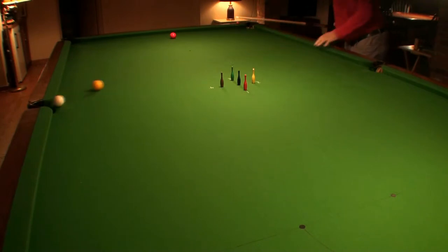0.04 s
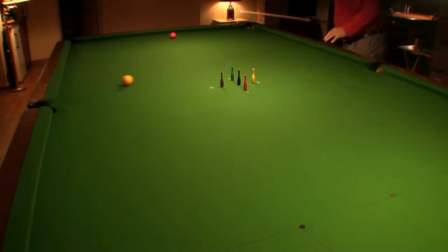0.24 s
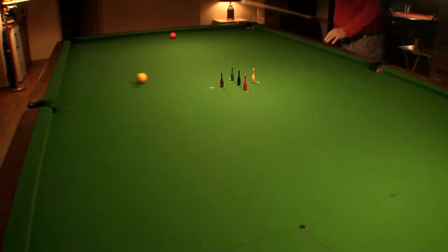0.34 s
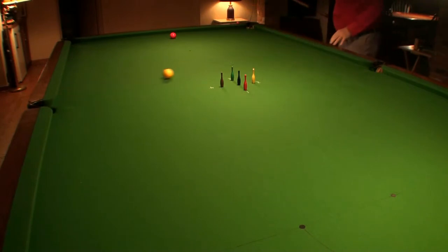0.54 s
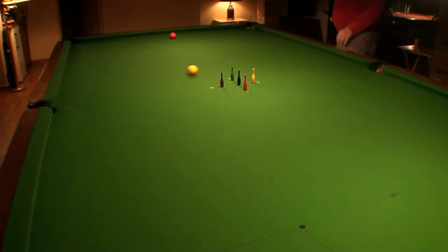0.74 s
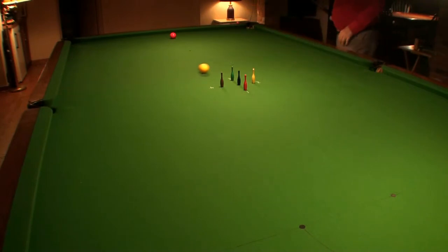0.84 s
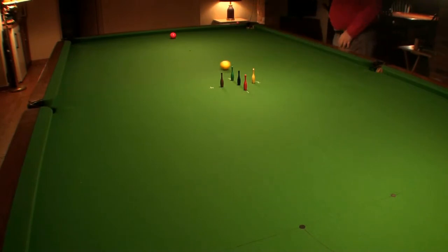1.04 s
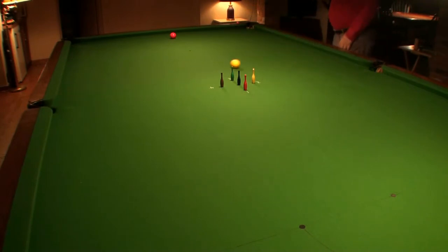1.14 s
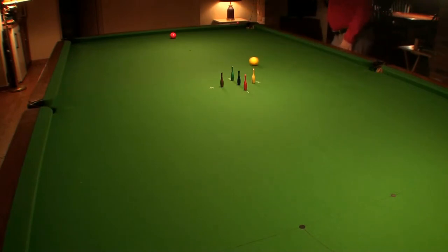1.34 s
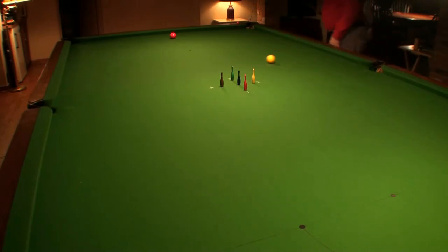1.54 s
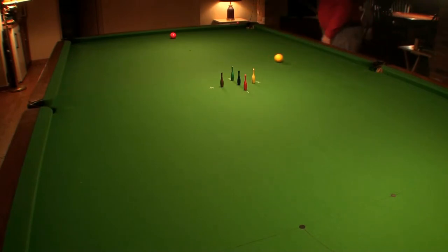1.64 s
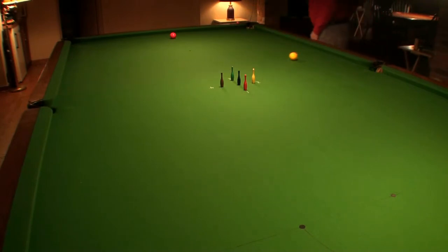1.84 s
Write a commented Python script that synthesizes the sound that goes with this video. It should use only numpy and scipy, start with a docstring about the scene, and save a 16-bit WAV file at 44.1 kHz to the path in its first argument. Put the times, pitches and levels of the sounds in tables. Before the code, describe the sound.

Billiard balls click sharply after a cue strike, then one rolls into a cushion.

```python
"""One shot on a billiard table in a quiet room. An earlier knock is dying away when the cue strikes,
setting shaft and ball ringing. The ball clicks hard against a second ball; a softer click and a brief
clatter follow. Near surfaces reflect the stroke and the two clicks as distinct echoes, then the room
reverberates. Afterwards a ball rolls on over the cloth and thumps into a cushion while the player
shuffles about."""
import sys
import numpy as np
from scipy import signal
from scipy.fft import rfft, irfft
from scipy.io import wavfile

SR = 44100
rng = np.random.default_rng(int(sys.argv[2]) if len(sys.argv) > 2 else 0)


def output_pcm(signal):
    """Save a mono or channel-first signal as 16-bit PCM at the path in sys.argv[1].

    Samples are clipped to [-1, 1] before scaling.
    """
    pcm = np.clip(np.atleast_2d(signal).T, -1, 1) * 32767
    wavfile.write(sys.argv[1], SR, np.round(pcm).astype(np.int16))


N = 83790
T = np.arange(N) / SR

# likeness of left and right in a diffuse field: frequency_hz, correlation
COHERENCE = [(60, 0.76), (250, 0.44), (420, 0.31), (700, 0.23), (1200, 0.23), (4000, 0.55), (8000, 0.7),
             (12000, 0.71)]
# reverberation time of the room: frequency_hz, t60_s
ROOM_T60 = [(100, 0.91), (250, 0.59), (600, 0.42), (1200, 0.39), (2800, 0.32), (4200, 0.41), (12000, 0.13)]
# colour of the reverberation: frequency_hz, gain_db
ROOM_COLOUR = [(130, 2), (400, 1.5), (1000, -0.5), (2000, -0.5), (3200, -2), (4300, -1), (9000, -1.5)]
# its lean, mostly to the left: frequency_hz, left_minus_right_db
ROOM_BALANCE = [(200, 4.5), (600, -2), (1300, 2), (2800, 1), (7000, 2), (12000, -5.5)]
ROOM_DB, ROOM_DELAY_S, ROOM_BUILD_S = 5.5, .003, 0.0039
SCATTER_DB, SCATTER_T60_S = 5, 0.078
# reflections off table, lamp and walls: delay_s, left_db, right_db
ECHOES = [(.0029, 4.5, -1), (.0063, 0.5, -2.5), (.0067, -16, -37), (0.009, 2, -40.5), (0.01, -7, -46),
          (0.024, -2.5, -9), (.0309, -14, -32), (.0313, -4.5, -9.5), (.0325, -8.5, -14)]
# stereo width, narrow in the bass: frequency_hz, side_gain_db
WIDTH = [(100, -10.5), (400, -7), (650, -1), (900, -1.5), (10000, 1), (13000, -8)]

# room tone and hiss: frequency_hz, relative_density_db
ROOM_TONE_SPECTRUM = [(25, -6), (40, -4), (65, 4), (100, -6.5), (300, -16), (1000, -8), (2500, -16.5),
                      (7000, -21.5), (13000, -25)]
# tail of the earlier knock: frequency_hz, relative_density_db
FADING_SPECTRUM = [(100, 5.5), (400, 1.5), (1000, -8.5), (2500, 0.5), (4000, -16), (7000, -43)]
# scuffs of shoes and clothes: start_s, level_db, rise_s, decay_s
SCUFFS = [(0.028, -53, 0.0083, 0.038), (0.465, -53.5, 0.01, 0.12), (0.534, -54.5, 0.006, 0.11),
          (0.598, -60, 0.0064, 0.049), (0.709, -58, 0.016, 0.27), (0.96, -48.5, 0.011, 0.037),
          (1.43, -57.5, 0.047, 0.072), (1.58, -46, 0.013, 0.041), (1.68, -57.5, 0.025, .05)]
# their friction noise: frequency_hz, relative_density_db
SCUFF_SPECTRUM = [(150, -15), (800, -0.5), (1500, -4.5), (2800, -0.5), (5000, -1), (8000, -2), (10000, -12),
                  (13000, -11.5)]
# loudness of the rolling ball: time_s, level_db
ROLL_LEVEL = [(0.15, -62), (0.3, -52), (0.85, -61), (1.12, -59), (1.22, -59), (1.35, -62.5), (1.6, -63),
              (1.74, -54), (1.9, -65)]
# its noise on the cloth: frequency_hz, relative_density_db
ROLL_SPECTRUM = [(60, -4), (180, 2), (500, -1.5), (1200, -8.5), (2500, -15.5), (6000, -47)]
# thumps on cushion and table: start_s, level_db, pitch_hz, t60_s, rail_db
THUMPS = [(0.0, -47.5, 150, 0.54, -49), (0.028, -46, 155.3, 0.54, -49), (0.538, -41.5, 119, 0.098, -51),
          (1.05, -48.5, 194, 0.082, -62), (1.659, -43, 129, 0.29, -43.5)]
# rumble of the rail: frequency_hz, gain_db
RAIL_SPECTRUM = [(50, 10), (130, 38), (300, 34.5), (600, 20.5), (1500, 8), (4000, 1)]
# knocks that shake the table: start_s, level_db
TABLE_KNOCKS = [(0.201, 1.5), (0.294, -4), (0.422, -11)]
# modes of the table's body: frequency_hz, level_db, t60_s
TABLE_MODES = [(61, -50, .12), (153.8, -44, 0.79), (225.6, -38, 0.5), (401, -38.5, 0.35)]
# bursts of scattered treble: start_s, level_db
TREBLE_BURSTS = [(0.202, -51.5), (0.293, -40), (0.422, -52.5)]
# their noise: frequency_hz, relative_density_db
TREBLE_SPECTRUM = [(2500, -29), (4500, 0), (6000, 3), (9000, 2.5), (13000, -9)]

# modes of shaft and ball: frequency_hz, level_db, t60_s
CUE_MODES = [(574, -16, 0.081), (670, -23.5, 0.048), (1130, -22, 0.046), (1183, -7.5, .035),
             (1342, -14, 0.049), (1780, -23.5, 0.14), (2444, -25.5, 0.033)]
# dull blow of the leather tip: frequency_hz, gain_db
TIP_SPECTRUM = [(50, -38), (110, -24), (220, 6.5), (550, 13), (1200, 16), (1800, 3), (2500, -4.5),
                (3300, -15.5), (6000, -25), (12000, -44)]
# light contacts: start_s, level_db
CLATTER = [(0.4537, -9.5), (0.467, -8.5), (0.4752, -13.5), (0.482, -9), (0.492, -26), (0.507, -10),
           (0.5388, -17.5)]
# ball on ball: start_s, level_db, brightness_ratio, direct_db, echo_db, wall_db, room_db
CLICKS = [(0.2885, 1.5, 1.0, 0, .5, 2.5, 0), (0.4189, -9, 0.92, -3.5, -3.5, 8.5, 2.5)]
# pulse of a hard contact: frequency_hz, gain_db
CLICK_SPECTRUM = [(50, -12), (120, -8.5), (250, -5.5), (650, -2), (1200, 6), (2000, 13), (3000, 13),
                  (3800, 7), (4700, -10.5), (6000, -16.5), (9000, -35), (13000, -27)]


def from_db(db):
    """Amplitude ratio: tenfold for every 20 dB."""
    return 10 ** (np.asarray(db) / 20)


def at_hz(points, hz):
    """Interpolation on a logarithmic frequency axis."""
    frequencies, values = np.transpose(points)
    return np.interp(np.log(np.maximum(hz, 1)), np.log(frequencies), values)


def pan(db):
    """Level difference: gains that put the left channel db above the right."""
    return from_db(np.array([[db], [-db]]) / 2)


def delay(x, seconds):
    """Time shift by a whole number of samples."""
    lag = int(np.clip(round(seconds * SR), 0, N - 1))
    return np.concatenate([np.zeros(x.shape[:-1] + (lag,)), x[..., :N - lag]], axis=-1)


def swell(start_s, rise_s, decay_s):
    """Linear rise, then exponential decay."""
    age = T - start_s
    return np.clip(age / rise_s, 0, 1) * np.exp(-np.maximum(age - rise_s, 0) / decay_s)


def ring(modes, rise_s):
    """Free vibration: a sum of damped sinusoids with a soft onset."""
    partials = sum(from_db(db - 60 * T / t60) * np.sin(2 * np.pi * hz * T) for hz, db, t60 in modes)
    return (1 - np.exp(-T / rise_s)) * partials


def blow(spectrum, brightness=1):
    """Minimum phase: the shortest causal pulse with this spectrum, scaled in frequency by brightness."""
    size = 8192
    hz = np.fft.rfftfreq(size, 1 / SR)
    cepstrum = irfft(np.log(from_db(at_hz(spectrum, hz / brightness))))
    cepstrum[1:size // 2] *= 2   # fold onto positive time
    cepstrum[size // 2 + 1:] = 0
    return np.pad(irfft(np.exp(rfft(cepstrum))), (0, N - size))


def noise(spectrum=None):
    """Partial coherence: stereo noise of rms 1, most alike in the deep bass and high treble."""
    hz = np.fft.rfftfreq(N, 1 / SR)
    mid, side = rfft(rng.standard_normal((2, N)))
    alike = at_hz(COHERENCE, hz)
    both = np.sqrt(1 + alike) * mid + np.sqrt(1 - alike) * side * [[1], [-1]]
    x = irfft(both * (1 if spectrum is None else from_db(at_hz(spectrum, hz))), N)
    return x / x.std()


def reverberate(x):
    """Convolution with a diffuse field: dense early scatter and a tail that decays band by band."""
    hz = np.fft.rfftfreq(N, 1 / SR)
    colour = from_db(at_hz(ROOM_COLOUR, hz) + at_hz(ROOM_BALANCE, hz) * [[.5], [-.5]])
    field = rfft(noise()) * colour
    centres, t60s = np.transpose(ROOM_T60)
    tail = 0
    for share, t60 in zip(np.eye(len(centres)), t60s):
        band = irfft(field * at_hz(list(zip(centres, share)), hz), N)
        tail += band * from_db(-60 * T / t60)
    scatter = irfft(rfft(noise()) * colour, N) * from_db(SCATTER_DB - 60 * T / SCATTER_T60_S)
    diffuse = (tail + scatter) * (1 - np.exp(-T / ROOM_BUILD_S))
    diffuse /= np.sqrt(np.sum(diffuse ** 2) / 2)
    response = from_db(ROOM_DB) * delay(diffuse, ROOM_DELAY_S)
    return signal.fftconvolve(np.atleast_2d(x), response, axes=-1)[:, :N]


def echoes(x):
    """Specular reflection: near hard surfaces return distinct, delayed copies."""
    return sum(from_db([[left], [right]]) * delay(x, lag_s) for lag_s, left, right in ECHOES)


def room_tone(level_db=-58.5):
    """Stationary noise: a low rumble with faint hiss."""
    return from_db(level_db) * noise(ROOM_TONE_SPECTRUM)


def earlier_knock(level_db=-45, t60_s=0.35):
    """Exponential decay: the tail of a knock loses equal decibels in equal times."""
    return from_db(level_db - 60 * T / t60_s) * noise(FADING_SPECTRUM)


def scuffs():
    """Friction noise: the player's shoes and clothes give soft, bright swishes."""
    envelope = sum(from_db(db) * swell(start_s, rise, decay) for start_s, db, rise, decay in SCUFFS)
    return envelope * noise(SCUFF_SPECTRUM)


def rolling_ball():
    """Rolling contact: a ball on cloth makes low noise that swells and fades."""
    return from_db(np.interp(T, *np.transpose(ROLL_LEVEL))) * noise(ROLL_SPECTRUM)


def cushions():
    """Damped resonance: rubber gives a low note, and the rail rumbles into the room."""
    push = blow(RAIL_SPECTRUM)
    notes = rumble = 0
    for start_s, db, hz, t60, rail_db in THUMPS:
        notes += delay(ring([(hz, db, t60)], rise_s=0.001), start_s)
        rumble += from_db(rail_db) * delay(push, start_s)
    return notes + reverberate(rumble)


def table_body():
    """Structural resonance: the table's low modes hum faintly under the knocks."""
    hum = ring(TABLE_MODES, rise_s=0.0025)
    return sum(from_db(db) * delay(hum, start_s) for start_s, db in TABLE_KNOCKS)


def scattered_treble(rise_s=0.002, decay_s=0.036):
    """Scattering: the top treble of each knock arrives as noise just behind it."""
    envelope = sum(from_db(db) * swell(start_s, rise_s, decay_s) for start_s, db in TREBLE_BURSTS)
    return envelope * noise(TREBLE_SPECTRUM)


def clatter(pan_db=3.5, room_db=-3.5):
    """Contact time limits bandwidth: slower collisions last longer and sound duller."""
    pulse = blow(CLICK_SPECTRUM, brightness=0.81)
    contacts = sum(from_db(db) * delay(pulse, start_s) for start_s, db in CLATTER)
    return contacts * pan(pan_db) + from_db(room_db) * reverberate(contacts)


def cue_stroke(start_s=0.2007, pan_db=7.1, echo_db=1.5, room_db=3):
    """Impulse excitation: shaft and ball ring briefly, and the tip's blow returns from the room."""
    knock = blow(TIP_SPECTRUM)
    direct = ring(CUE_MODES, rise_s=0.0012) * pan(pan_db)
    reflected = from_db(echo_db) * echoes(knock) + from_db(room_db) * reverberate(knock)
    return delay(direct + reflected, start_s)


def ball_clicks(pan_db=6, wall_delay_s=0.0069, wall_pan_db=5):
    """Directivity: a click beams along the line of impact, so one wall's echo outdoes the direct sound."""
    clicks = 0
    for start_s, db, brightness, direct_db, echo_db, wall_db, room_db in CLICKS:
        pulse = from_db(db) * delay(blow(CLICK_SPECTRUM, brightness), start_s)
        direct = from_db(direct_db) * pan(pan_db) * pulse
        wall = from_db([[wall_db], [wall_db - wall_pan_db]]) * delay(pulse, wall_delay_s)
        clicks += direct + wall + from_db(echo_db) * echoes(pulse) + from_db(room_db) * reverberate(pulse)
    return clicks


def scene():
    """Superposition: the pressures of all sources add."""
    shot = cue_stroke() + ball_clicks() + clatter() + scattered_treble() + table_body()
    return shot + cushions() + scuffs() + rolling_ball() + earlier_knock() + room_tone()


def record(dry, peak_limit=.92, cutoff_hz=12800):
    """Mid-side filtering narrows the bass; peaks are then clipped and the top treble is cut."""
    hz = np.fft.rfftfreq(N, 1 / SR)
    mid = (dry[0] + dry[1]) / 2
    side = irfft(rfft((dry[0] - dry[1]) / 2) * from_db(at_hz(WIDTH, hz)), N)
    clipped = np.clip([mid + side, mid - side], -peak_limit, peak_limit)
    return signal.sosfilt(signal.ellip(10, .1, 70, cutoff_hz, fs=SR, output="sos"), clipped)


dry = scene()
out = record(dry)
output_pcm(out)
```